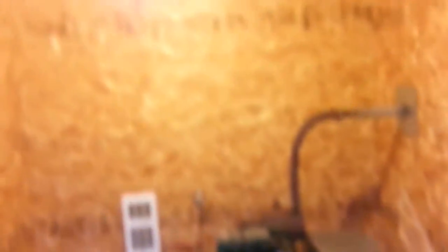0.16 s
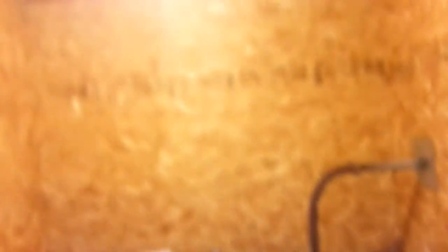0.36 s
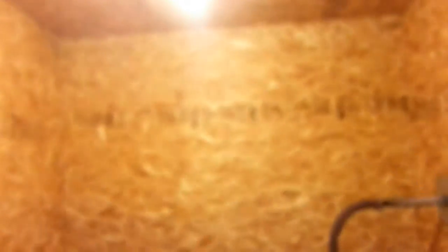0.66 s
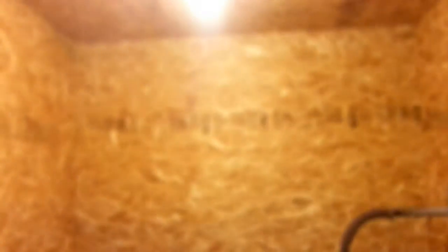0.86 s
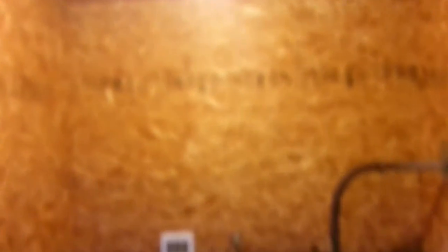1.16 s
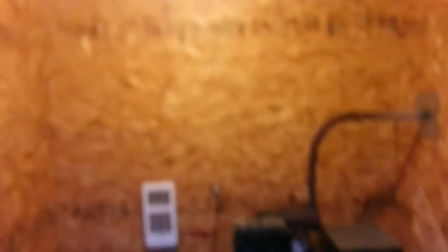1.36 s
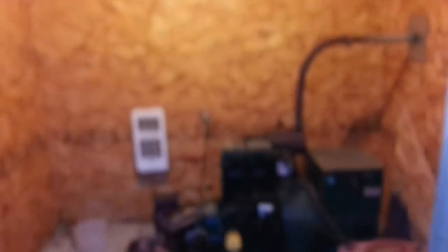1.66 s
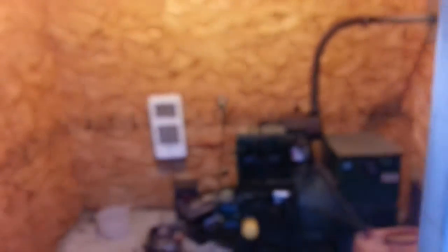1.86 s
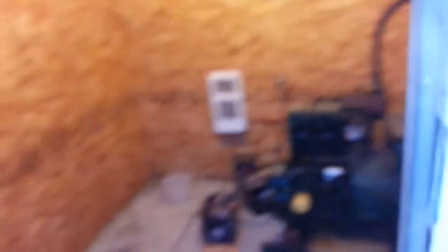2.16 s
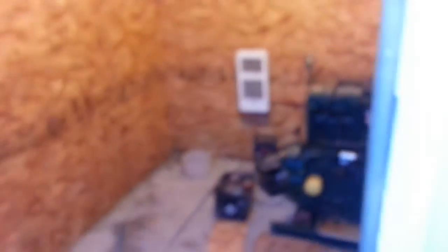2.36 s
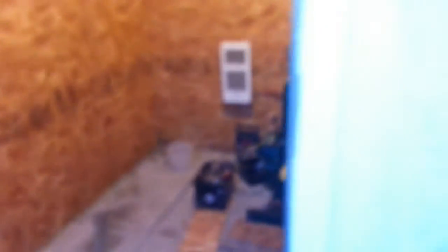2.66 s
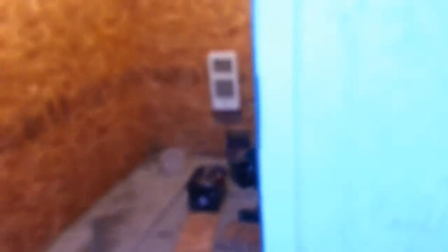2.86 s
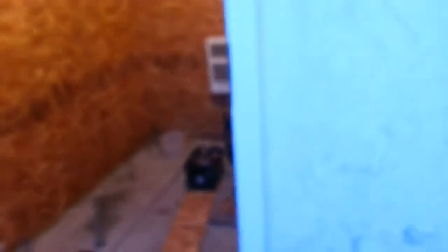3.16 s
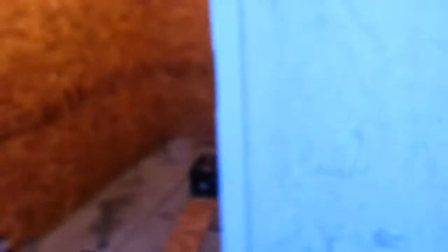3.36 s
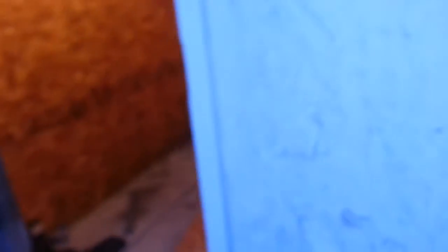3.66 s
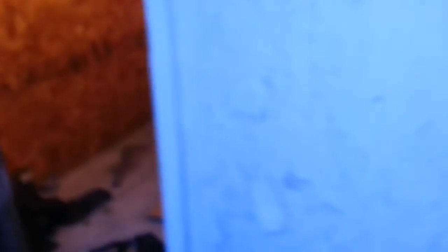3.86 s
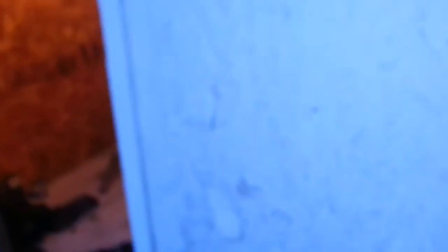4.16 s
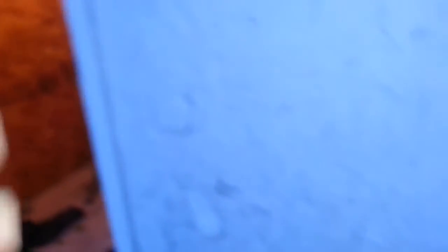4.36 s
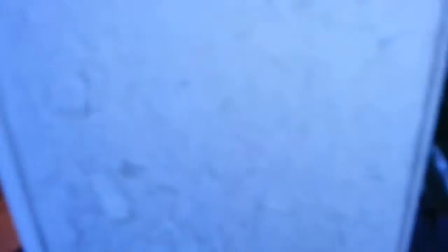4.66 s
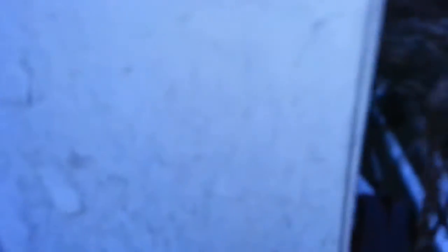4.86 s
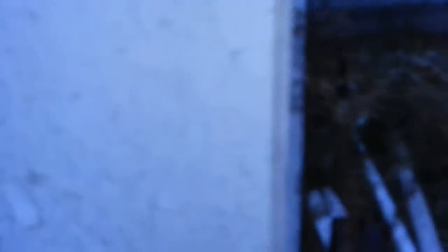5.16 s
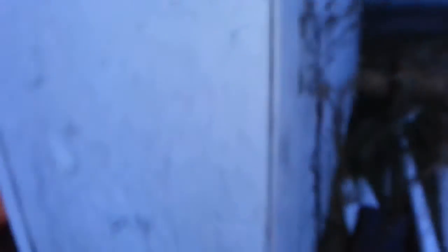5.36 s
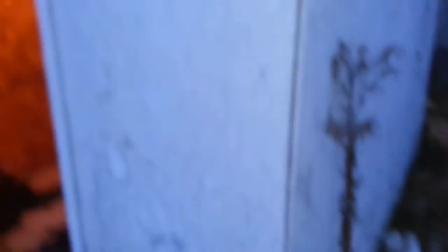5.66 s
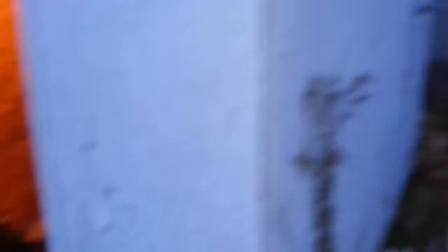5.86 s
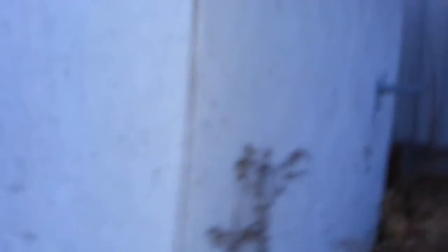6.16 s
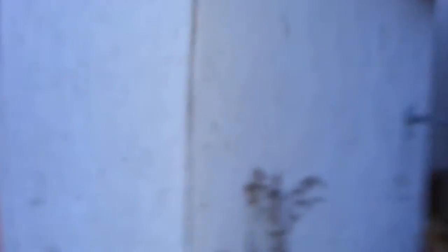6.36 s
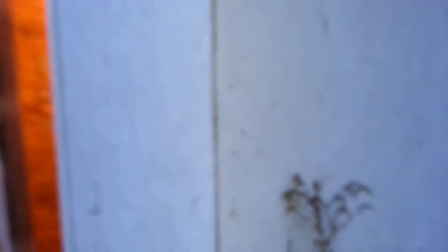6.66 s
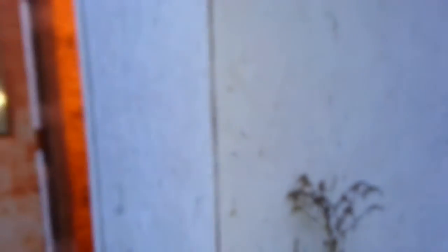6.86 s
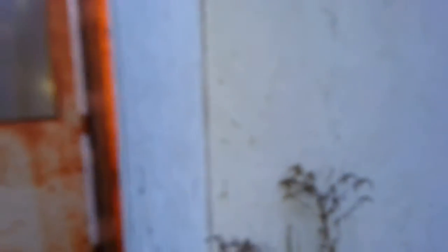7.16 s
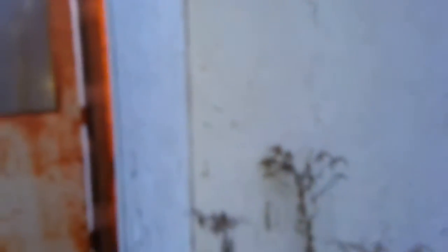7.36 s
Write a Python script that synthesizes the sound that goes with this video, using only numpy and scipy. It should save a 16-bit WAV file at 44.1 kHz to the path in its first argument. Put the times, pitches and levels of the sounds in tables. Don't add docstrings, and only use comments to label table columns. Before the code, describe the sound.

A large single-cylinder diesel engine thumps fast and steadily in a small wooden shed, booming, with hard metallic clatter that thins slightly as the listener steps outside.

```python
import sys
import numpy as np
from scipy import signal
from scipy.fft import rfft, irfft
from scipy.io import wavfile
from scipy.ndimage import uniform_filter1d, minimum_filter1d, map_coordinates

SR = 44100
rng = np.random.default_rng(int(sys.argv[2]) if len(sys.argv) > 2 else 0)


def how_loud(loudness_db):
    steps = np.asarray(loudness_db, float) / 20
    return 10 ** steps


def generate_wav(sig):
    pcm = np.round(np.clip(np.atleast_2d(sig).T, -1, 1) * 32767).astype(np.int16)
    wavfile.write(sys.argv[1], SR, pcm)


N = 331632
CYCLE_HZ = 16.5139


def tilt(x, gain):
    cepstrum = irfft(np.log(gain + 1e-6), N)
    cepstrum[1:N // 2] *= 2
    cepstrum[N // 2 + 1:] = 0
    return irfft(rfft(x) * np.exp(rfft(cepstrum)), N)


def shape(hz, values):
    return np.interp(np.log(np.fft.rfftfreq(N, 1 / SR) + 1), np.log(hz), values)


def edge(hz, order=3):
    return 1 / (1 + (np.fft.rfftfreq(N, 1 / SR) / hz) ** (2 * order))


def walk(rate, step=1):
    hold = int(SR / step / rate)
    count = -(-N // step)
    levels = np.repeat(rng.standard_normal(count // hold + 1), hold)
    return 1.38 * uniform_filter1d(uniform_filter1d(levels, hold), hold)[:count]


def ramp(at_s, takes_s):
    return .5 + .5 * np.tanh((np.arange(N) / SR - at_s) / takes_s)


def crank():
    # time in seconds, extra distance in metres.
    path = [(0, 0), (2.6, -.17), (3.85, .2), (4.9, .33), (6.4, .14), (7.52, -.73)]
    s = np.arange(N) / SR
    extra_m = uniform_filter1d(np.interp(s, *np.transpose(path)), size=22000)
    late_s = extra_m / 343
    return (s - .0067 - late_s) * CYCLE_HZ + 1 + 0.00096 * walk(3)


def puff(turn):
    swell = how_loud(5.0 * np.cos(2 * np.pi * (turn - .54)) + 2.6 * walk(12))
    band = np.sqrt(edge(14450, order=60) * (1 - edge(13800, order=60)))
    hiss = irfft(rfft(rng.standard_normal(N)) * band, N)
    port_gain = how_loud(np.array([[-1.], [1.]]))
    return how_loud(-46.5) * swell * hiss / hiss.std() * port_gain


def standing(ports):
    spots = [
        (540, 32, 2, 1.33, 5),
        (770, 51, -2, 1, 2),
        (685, 36, 1, 2.7, 3),
        (400, 96, 1.5, 2, -3.5),
        (1183, 33, -0.1, 2.84, 6.5),
        (1910, 200, 1.5, 2.1, -5),
        (1510, 370, 7, 9, 1.5),
        (1905, 250, 6.5, 9, -3),
    ]
    bins, spectrum, out = np.fft.rfftfreq(N, 1 / SR), rfft(ports), ports
    for hz, width_hz, start_s, end_s, db in spots:
        band = irfft(spectrum / (1 + (2 * (bins - hz) / width_hz) ** 2), N)
        present = ramp(start_s, 0.077) - ramp(end_s, 0.16)
        out = out + (how_loud(db) - 1) * present * band
    return out


def head(turn, corner):
    # level in dB in the doorway, level in dB outside.
    tones_db = [(-41, -22.5), (-35, -28), (-30, -53.5), (-34.5, -40), (-37, -22), (-37, -31)]
    multiples = [115, 116, 117, 121, 123, 125]
    meet = .94
    out = 0
    for order, (door_db, out_db) in zip(multiples, tones_db):
        shake = np.repeat(walk(6, step=16) + 1j * walk(6, step=16), 16)[:N]
        level = how_loud(door_db + (out_db - door_db) * corner)
        swing = level * np.exp(2j * np.pi * order * (turn - meet)) * (1 + 0.17 * shake)
        left = how_loud(1.0) * swing.real
        right = how_loud(-4.0) * (swing * np.exp(1.2j)).real
        out = out + np.sqrt(2) * np.array([left, right])
    return out * how_loud(.7 * np.cos(2 * np.pi * (turn - meet)) + 0.4 * walk(11))


def rattle(turn, corner, moving=0.914, still=0.99, even=0.7):
    size, count = int(SR / CYCLE_HZ), int(turn[-1]) + 3
    fresh = rfft(rng.standard_normal((count, size)))
    outside = np.interp(np.arange(count), turn, corner)
    memory = np.clip(moving + (still - moving) * outside ** 2, 0, .999)
    for k in range(1, count):
        fresh[k] = memory[k] * fresh[k - 1] + np.sqrt(1 - memory[k] ** 2) * fresh[k]
    cycles = irfft(fresh / np.abs(fresh) ** even, size).ravel()
    return map_coordinates(cycles / cycles.std(), [turn * size], order=3)


def beat(ports, turn, corner, depth, casing_db):
    # place in the cycle 0-1, dB in the doorway, dB outside.
    blows = [
        [(.04, -7.5, -3), (.21, -4, 5), (.3, -4.5, -2), (.43, 5, 2.5), (.55, 1.5, 1), (.62, 3.5, 5),
         (.73, 4, -3.5), (.9, 5, 0)],
        [(.05, 8, 4), (.29, -2, -1), (.37, 6, 0), (.46, -5, -3.5), (.62, -6, -4), (.8, -3.5, 2.5)],
        [(.06, -1, 12), (.19, -3, 7), (.33, -4, -0.5), (.41, 7, -21), (.55, -4, -13), (.66, 5, 5.5),
         (.94, 4, -6)],
        [(.03, 5.5, 4.5), (.37, 0.5, -4.5), (.55, 0.5, -5), (.96, 2.5, 4.5)],
        [(.04, 4, 2.5), (.38, -2.5, -2), (.95, 1.5, 3.5)],
    ]
    widths = [0.03, 0.031, 0.016, 0.029, 0.03]
    tops_hz = [920, 1550, 2100, 4640]
    below = [0] + [edge(hz, order=4) for hz in tops_hz] + [1]
    place, spectrum, out = np.linspace(0, 1, 500), rfft(ports), 0
    for part in range(len(blows)):
        at, *strength_db = np.transpose(blows[part])
        away = (place - at[:, None] + .5) % 1 - .5
        bumps = np.exp(-.5 * (away / widths[part]) ** 2)
        door_db, out_db = (np.interp(turn % 1, place, db @ bumps) for db in strength_db)
        gate = how_loud(depth * (door_db + (out_db - door_db) * corner) + 0.75 * walk(13))
        gate = gate / np.sqrt(uniform_filter1d(gate ** 2, size=10680))
        band = irfft(spectrum * (below[part + 1] - below[part]), N)
        out = out + band * gate * how_loud(casing_db * (part == 0))
    return out


def clatter(turn, corner, back):
    # frequency in Hz, then dB for doorway left, doorway right,
    # outside left, outside right.
    colours = [(290, 8.5, 4, 8, 1), (430, 3.5, -0.5, 6.5, 2), (627, 7, 5, 7, 9), (988, 9.5, 1.5, 6.5, 2.5),
               (1190, 10.5, 7, 12.5, 12.5), (1625, 13, 5, 17, 10), (2320, 4.5, -4, 13.5, 8),
               (3160, 3, -1.5, 8, 4), (4670, 0.5, -1.5, 3, 0.5), (5750, -0.5, 1.5, 4.5, 3),
               (7140, -9, 12.5, -6.5, 10.5), (8690, -20, -1.5, -7.5, -1.5), (10000, -21, -5, -16, -5.5),
               (12900, -18, -7.5, -15.5, -8.5)]
    # frequency in Hz, width in Hz, dB over the colour in
    metal_rings = [(369, 16.3, 6.5, 5, 7, 13), (411, 21, -13, 5, -13, 2), (495.1, 9, 6.5, 11, 9.5, 11),
                   (551.7, 17.7, 10.5, 12.5, 13, -2.5), (673.2, 23, 10, 12.5, 7, 9),
                   (797, 41, 3, 7, 4.5, 5.5), (872, 24, -13, 10, 11.5, -14), (908, 61, -13, -12, -5, -17),
                   (970, 14.3, 0, -6, 12.5, 11), (1055, 12, 7, 11.5, -3, 8.5), (1119, 16, 0, 2, 12, 10),
                   (1160, 14, 4, 6, 9.5, 3.5),
                   (1193, 21, -1.5, -8, 6, -24), (1306, 11, 10.5, 13.5, 12, -18), (1347, 16, 13, 11, 8, 1),
                   (1441, 26, 9.5, -11, -3.5, 12.5), (1500, 15, 14, 6, 5, 2), (1526, 9.5, 1, -12, -8, 10),
                   (1600, 28, 6, 16.5, 6.5, 3), (1692, 20, 12.5, -5, 8.5, -20),
                   (1867, 110, 10, -6, 8.5, 10.5), (1932, 49, 5.5, 12, 0.5, 0.5), (2014, 75, 6, -9, 7.5, 1),
                   (2368, 27, 4, 1, 3.5, 5), (2975, 21, 9, 14, -27, -4)]
    # frequency in Hz, share repeating from cycle to cycle 0-1, likeness of the ports 0-1.
    orderly = [(314, 0.91, 1), (700, 0.91, 0.87), (1460, 1, 0.06), (2330, 0.8, 0.35), (2960, 0.89, 0),
               (5070, 0.8, 0), (7000, 0, 0.29), (10000, 0.04, 0)]
    hz, repeat, alike = np.transpose(orderly)
    repeat, alike = (np.clip(shape(hz, v), 0, 1) for v in (repeat, alike))
    noises = []
    for _ in range(2):
        steady = np.sqrt(repeat) * rfft(rattle(turn, corner))
        noises.append(steady + np.sqrt(1 - repeat) * rfft(rng.standard_normal(N)))
    near, far = noises
    ports = irfft(np.array([near, alike * near + np.sqrt(1 - alike ** 2) * far]), N)

    bins, heard = np.fft.rfftfreq(N, 1 / SR), []
    ends = (1 - edge(307, order=5)) * edge(13350, order=50)
    colour_hz, *colour_db = np.transpose(colours)
    for place in range(4):
        rings = 1
        for ring_hz, width_hz, *ring_db in metal_rings:
            peak = (1 + (2 * (bins - ring_hz) / width_hz) ** 2) ** 2
            rings = rings + (how_loud(2 * ring_db[place]) - 1) / peak
        colour = how_loud(shape(colour_hz, colour_db[place]))
        heard.append(tilt(ports[place % 2], colour * np.sqrt(np.maximum(rings, .05) * ends)))
    door, outside = np.array(heard[:2]), np.array(heard[2:])
    depth = 1 - 0.41 * ramp(7.2, .03)
    casing_db = 3.5 * (.7 - back)
    mixed = beat((1 - corner) * door + corner * outside, turn, corner, depth, casing_db)
    return how_loud(-60) * np.sqrt(SR / 2) * mixed


def thump(turn, back, step=16):
    # multiple of the cycle, dB in the doorway, dB outside.
    orders_db = [(2, -60, -59), (3, -41, -46), (4, -34, -37.5), (5, -41, -36.5), (6, -46, -43.5),
                 (7, -35.5, -48), (8, -35, -43.5), (9, -37.5, -38.5), (10, -32, -39.5), (11, -40, -44),
                 (12, -39.5, -44), (13, -42, -53), (14, -32.5, -44.5), (15, -34, -49), (16, -26, -37),
                 (17, -28.5, -47), (18, -37.5, -43), (19, -41, -59), (20, -43, -53.5)]
    pushes = [(5, .56, .02, 4), (12, .53, .1, 9), (20, .4, -.1, 16)]
    turn, back, ports = turn[::step], back[::step], 0
    for order, door_db, out_db in orders_db:
        top, place, spread, centre = next(push for push in pushes if order <= push[0])
        start = -place * order - spread * (order - centre) ** 2
        level = how_loud(door_db + (out_db - door_db) * back) * np.sqrt(2)
        swing = level * np.exp(2j * np.pi * (order * turn + start))
        shake, apart = (walk(14, step=step) + 1j * walk(14, step=step) for _ in range(2))
        common = 1 + (.12 if order < 6 else .3) * shake
        lean = how_loud(0.15 * order - 1.5)
        left = lean * (common + 0.21 * apart)
        right = (common - 0.11 * apart) / lean
        ports = ports + (swing * np.array([left, right])).real
    return signal.resample_poly(ports, step, 1, axis=1)[:, :N] * how_loud(1.1 * walk(5.9))


def scene():
    # time of the step in seconds, share of the way round the corner 0-1.
    steps = [
        (2.2, 0.36),
        (2.7, .45),
    ]
    post = ramp(2.37 - 0.19, 0.082) - ramp(2.37 + 0.19, 0.078)
    back = 0.87 * ramp(1.0, 0.63) - 0.36 * post
    corner = np.clip(.13 + sum(share * ramp(s, 0.12) for s, share in steps), 0, 1)
    turn = crank()
    thump_db = 0.2 - 1.7 * corner
    low = how_loud(thump_db) * thump(turn, back)
    metal = standing(clatter(turn, corner, back) + head(turn, corner))
    return low + metal + puff(turn)


def low_pass(x):
    return signal.sosfilt(signal.butter(12, 14860, fs=SR, output="sos"), x)


def record(dry):
    need = np.minimum(1, .86 / (np.abs(dry).max(axis=0) + 1e-9))
    gain = uniform_filter1d(minimum_filter1d(need, size=161), size=81)
    rounded = np.tanh(0.95 * dry * gain)
    gap_top = edge(14500, order=150) - edge(13760, order=150)
    top = .2 * edge(14500, order=150) + edge(13400, order=150) + gap_top
    return low_pass(irfft(rfft(rounded) * top, N))


dry = scene()
out = record(dry)
generate_wav(out)
```